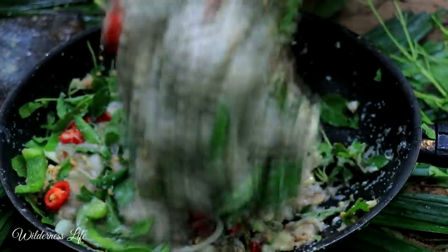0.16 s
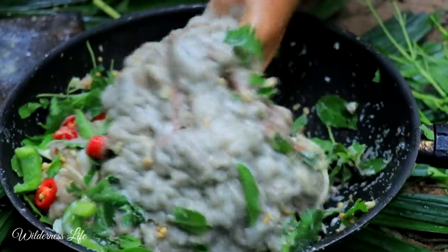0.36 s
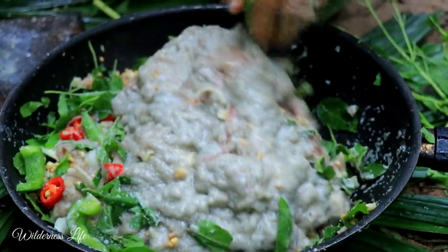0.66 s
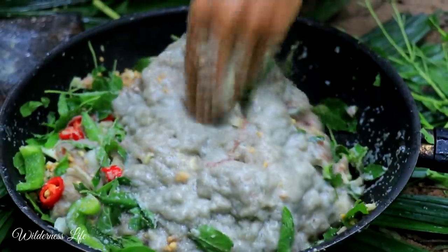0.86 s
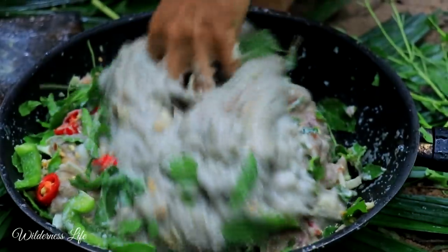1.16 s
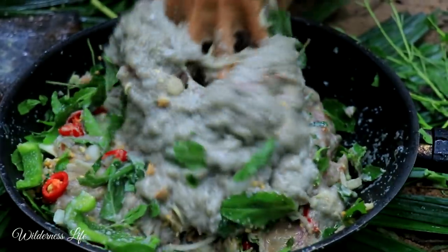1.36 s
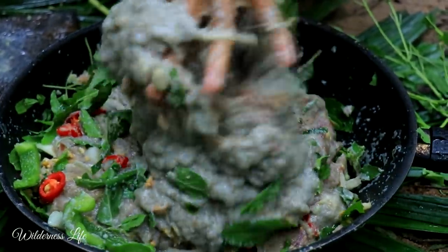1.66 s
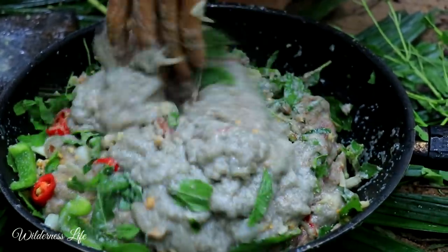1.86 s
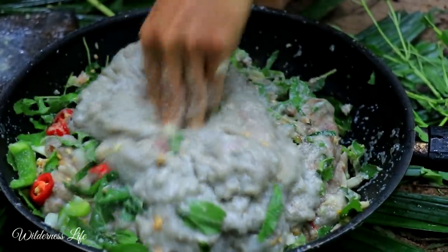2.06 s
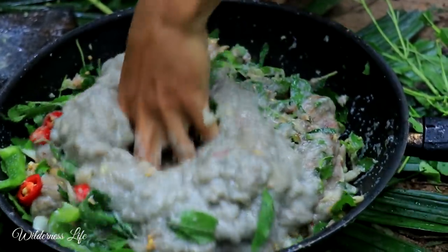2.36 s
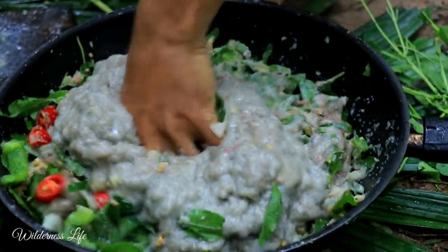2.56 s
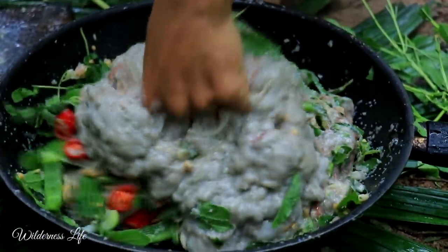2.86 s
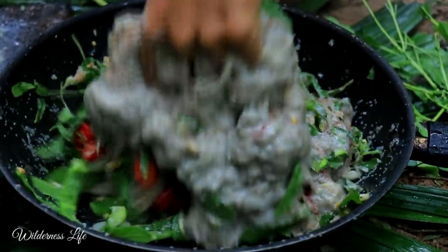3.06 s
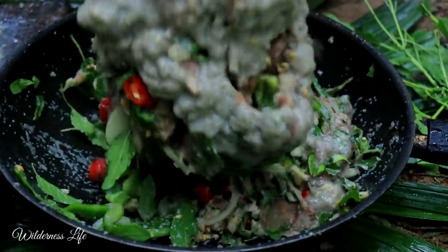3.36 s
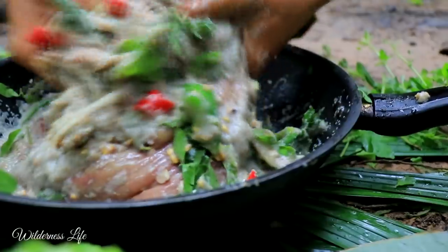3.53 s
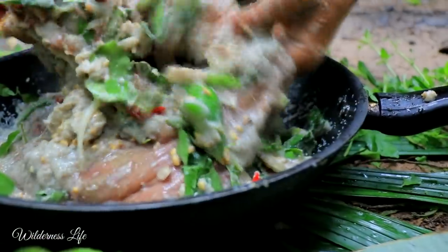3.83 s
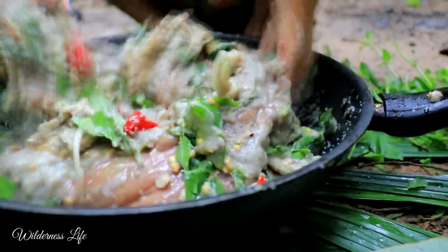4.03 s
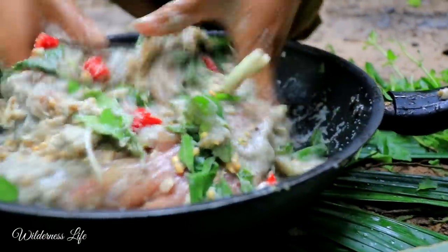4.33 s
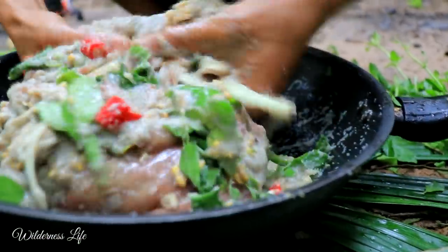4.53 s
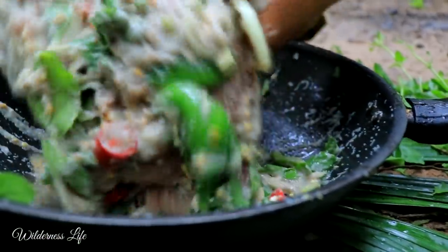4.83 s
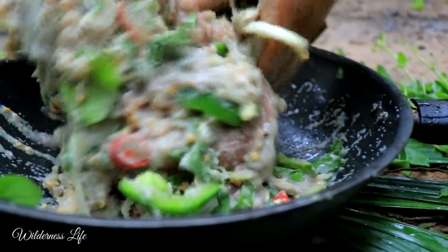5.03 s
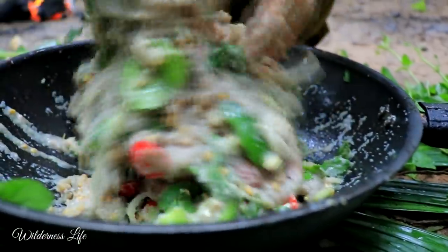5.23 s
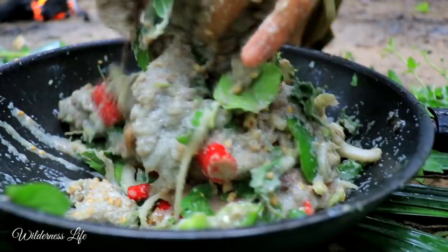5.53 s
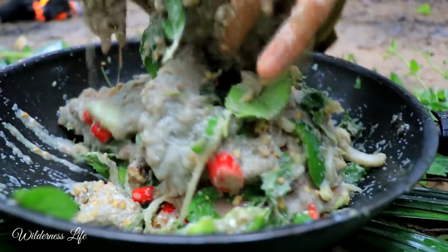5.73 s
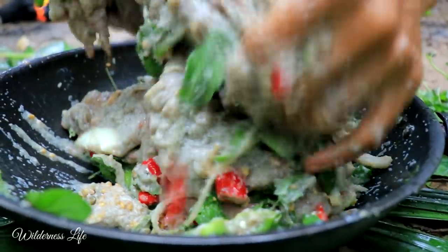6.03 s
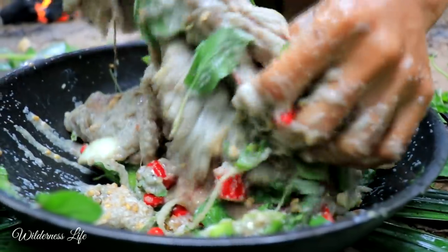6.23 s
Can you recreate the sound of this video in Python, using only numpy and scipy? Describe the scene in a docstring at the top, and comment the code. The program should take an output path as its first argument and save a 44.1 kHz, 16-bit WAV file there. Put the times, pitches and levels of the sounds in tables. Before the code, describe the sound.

Very close stereo microphones catch hands working a sticky, wet mass in a pan outdoors. Small bubbles smack, air pockets pop and slime smears, while a faint rising bird whistle and one dry trill sound early on. A tiny dropout breaks the sound midway, then the squelching returns louder and thicker, with gurgles, before easing off. Low rumble, hiss and insects lie far behind.

```python
"""Hands knead a wet, sticky mass of roe in a pan outdoors, close to a pair of microphones.
Air pockets pop, small bubbles smack and gurgle (damped tones of rising pitch); slime smears as shaped noise.
Far off lie a low rumble, hiss and insects (bands of noise); a rising bird whistle and a faint far call
are gliding tones, one dry trill is a roll of ringing modes. The sound drops out once, briefly."""
import sys
import numpy as np
from scipy import signal
from scipy.fft import rfft, irfft, next_fast_len
from scipy.io import wavfile
from scipy.ndimage import map_coordinates

SR = 44100
rng = np.random.default_rng(int(sys.argv[2]) if len(sys.argv) > 2 else 0)


def unload_audio(sound):
    """Save the sound as a 16-bit wav file, at the path given as the first command line argument."""
    columns = np.transpose(np.atleast_2d(sound))
    # keep every value between -1 and 1, then stretch to whole-number steps
    steps = np.round(np.clip(columns, -1, 1) * 32767)
    wavfile.write(sys.argv[1], SR, steps.astype(np.int16))


N = 281799

# the brief silence: (start [s], end [s])
SILENCE = (3.4455, 3.508)


def amp(db):
    """Gain of a level in dB."""
    return 10 ** (np.asarray(db) / 20)


def unit(x):
    """x at rms 1."""
    return x / np.sqrt(np.mean(x ** 2) + 1e-20)


def along(points, hz):
    """Values at hz, read from (Hz, value) points on a log frequency axis."""
    f, v = np.transpose(points)
    return np.interp(np.log(hz + 1), np.log(f + 1), v, left=v[0], right=v[-1])


def curves(rows):
    """One value per sample for each column after the time."""
    s, *cols = np.transpose(rows)
    return [np.interp(np.arange(N) / SR, s, c) for c in cols]


def wobble(rate):
    """A smooth random curve, rate knots a second."""
    knots = rng.standard_normal(N // 100)
    return map_coordinates(knots, [np.arange(N) * rate / SR])


def filtered(x, response):
    """x with its spectrum multiplied by a response of frequency."""
    m = next_fast_len(N + 8192)
    spectrum = rfft(x, m) * response(np.fft.rfftfreq(m, 1 / SR))
    return irfft(spectrum, m)[..., :N]


def rush(spectrum, alike):
    """Stereo noise of rms 1; the likeness of left and right sets its mix of mid and side at each frequency."""
    def mid_side_gain(hz):
        turn = np.arccos(np.clip(along(alike, hz), -1, 1)) / 2
        return amp(along(spectrum, hz)) * [np.cos(turn), np.sin(turn)]

    mid, side = filtered(rng.standard_normal((2, N)), mid_side_gain)
    return unit(np.array([mid + side, mid - side]))


def bubbles(s, db, hz, cycles, pan_db, lag_s, size, rise=0.01076, start=0.1107):
    """Damped tones whose pitch climbs as the cavity opens; each has its own level and time at either microphone."""
    out, k = np.zeros((2, N)), np.arange(size)
    for ch, side in enumerate((.5, -.5)):
        at = (s + side * lag_s) * SR
        first = np.ceil(at)
        turns = (k + (first - at)[:, None]) * hz[:, None] / SR
        swell = start * np.sqrt(cycles)[:, None]  # a longer-lived cavity starts more softly
        shape = amp(-60 * turns / cycles[:, None]) * (1 - np.exp(-turns / swell))
        shape *= amp(db + side * pan_db)[:, None] / shape.max(axis=1, keepdims=True)
        tone = shape * np.sin(2 * np.pi * turns * (1 + rise * turns))
        index = np.clip(first.astype(int)[:, None] + k, 0, N)
        out[ch] = np.bincount(index.ravel(), tone.ravel(), N + 1)[:N]
    return out


def swarm(count, centre_hz, octaves, cycles, scatter_db, pan_db, lag_s, size):
    """A random crowd of bubbles at rms 1; any scatter in level makes many small and few large."""
    u, g = rng.random((count, 2)), rng.standard_normal((count, 4))
    hz = np.clip(centre_hz * 2 ** (octaves * g[:, 0]), 200, SR / 3)
    db = -scatter_db * np.log(u[:, 1] + 0.0033)
    life = cycles * 1.743 ** g[:, 1]
    return unit(bubbles(u[:, 0] * N / SR, db, hz, life, pan_db * g[:, 2], lag_s * g[:, 3], size))


def glide(rows, waver_hz, flutter_db, rate):
    """A gliding, slightly unsteady tone, silent outside its rows."""
    hz, db = curves(rows)
    t = np.arange(N) / SR
    on = (t >= rows[0][0]) & (t < rows[-1][0])
    level = amp(db + flutter_db * wobble(rate))
    phase = 2 * np.pi * np.cumsum(hz + waver_hz * wobble(rate)) / SR
    return on * level * np.sqrt(2) * np.sin(phase)


def kneading():
    """Levels in dB of big pockets, small bubbles and film: the powers of steady effort and squeezes added."""
    # steady working of the hands: (time [s], effort [relative dB], brightness [dB]: film up, pockets down)
    steady = [(0, -63.5, 5.5), (.5, -55, 0), (.78, -62.5, 1), (1.0, -59.5, -0.5), (1.3, -55, 3),
              (1.55, -62, -0.5), (2.0, -64, 1.5), (2.4, -54, -2), (3.0, -53.5, -6), (3.44, -56.5, -1),
              (3.51, -46, -1.5), (3.75, -51.5, 1.5), (4.17, -50, -6), (4.22, -61, 6), (4.28, -62, 13.5),
              (4.295, -45, -4), (4.9, -47, -1.5), (5.3, -52.5, 0.5), (5.62, -57, 2), (6.15, -63.5, 0),
              (6.39, -55, 6)]
    # single squeezes on top: (time of peak [s], peak [relative dB], length [s], brightness [dB])
    grips = [(.01, -50, 0.031, 9), (0.331, -45.5, 0.122, -2), (1.037, -43.5, 0.0145, -4),
             (1.215, -56, 0.194, -6.5), (1.435, -53.5, 0.055, 1.5), (1.614, -54.5, 0.108, -2),
             (1.897, -45, 0.0525, -2), (2.115, -53.5, 0.096, 6), (2.313, -50, 0.0455, -6),
             (2.704, -48, 0.18, -6), (2.846, -51.5, 0.043, 7), (3.141, -51.5, 0.112, -1),
             (3.269, -43.5, 0.071, -2.5), (3.619, -53.5, 0.07, -10.5), (3.962, -47.5, 0.041, -2),
             (4.079, -53, 0.115, 7.5), (4.397, -38, 0.1093, -3), (4.472, -44.5, 0.213, -7.5),
             (4.597, -44, 0.0345, -5.5), (4.644, -44.5, 0.081, -10), (4.728, -41.5, 0.1845, -0.5),
             (5.029, -47, 0.106, -5), (5.21, -65, .08, 0), (5.745, -49.5, 0.022, -9.5),
             (5.982, -48, 0.263, 3)]
    # gain for each dB of brightness: (pockets [dB], bubbles [dB], film [dB])
    tilt = np.array((-1.027, 0.122, 0.87))[:, None]
    rise_share, edge_db = 0.482, 10.5  # part of a squeeze spent rising; drop from its peak to either end

    t = np.arange(N) / SR
    effort_db, bright_db = curves(steady)
    power = amp(effort_db + tilt * bright_db) ** 2
    for s, db, length, squeeze_bright_db in grips:
        away = np.where(t < s, (s - t) / rise_share, (t - s) / (1 - rise_share)) / length
        power = power + amp(db + tilt * squeeze_bright_db) ** 2 * amp(-edge_db * away) ** 2
    return 10 * np.log10(power)


def clumps(count, fade_s, floor):
    """A random curve of spread 1 that jumps up as slime tears and sinks back more slowly."""
    u, tears = rng.random((count, 2)), np.zeros(N)
    tears[(u[:, 0] * N).astype(int)] = -np.log(u[:, 1] + 1e-6)
    fading = signal.lfilter([1], [1, -np.exp(-1 / (fade_s * SR))], tears)
    curve = np.log(fading + floor)
    return unit(curve - curve.mean())


def squelch():
    """Trapped air of several sizes crackles, mostly in clumps, while slime smears along hand and pan."""
    # colour of the smearing slime: (frequency [Hz], level [relative dB])
    slime_colour = [(200, -13.5), (350, 7.5), (700, -5.5), (1200, 6), (2500, -6), (4000, -4.5), (6000, -17),
                    (10000, -8), (16000, -47)]
    # the mass close to the microphones: (frequency [Hz], left-right likeness [-1 to 1])
    close_likeness = [(60, 0.86), (240, 1), (950, 0.5), (3770, -0.51), (15000, 0.25)]
    mush_db, mush_per_db = -49, 0.13  # above this level the clumps run together, by this share for each dB

    pocket_db, bubble_db, film_db = kneading()
    apart = np.clip(1 - mush_per_db * (bubble_db - mush_db), 0, 1)
    clump = clumps(count=480, fade_s=0.0185, floor=0.24) * apart
    pockets = swarm(count=4000, centre_hz=1084, octaves=0.4625, cycles=7.5, scatter_db=3.0,
                    pan_db=4.0, lag_s=3e-5, size=500)
    smacks = swarm(count=6000, centre_hz=2800, octaves=0.3644, cycles=6.56, scatter_db=3.0,
                   pan_db=4.5, lag_s=8e-5, size=250)
    film = swarm(count=14000, centre_hz=8200, octaves=.55, cycles=13, scatter_db=3.5,
                 pan_db=3, lag_s=9e-5, size=100)
    lesser = swarm(count=260, centre_hz=4340, octaves=1.129, cycles=7.5, scatter_db=0.0,
                   pan_db=1.5, lag_s=0.000139, size=600)
    gulps = swarm(count=900, centre_hz=480, octaves=0.386, cycles=3.67, scatter_db=2,
                  pan_db=6.0, lag_s=1.5e-5, size=1200)
    out = amp(pocket_db - 5.0 + 2.96 * clump) * pockets
    # smacks and film lean to the right
    out += amp(bubble_db - 1.0 + 0.67 * clump) * smacks * amp([[-1.1], [1.1]])
    out += amp(film_db + 0.7252 + 3.22 * clump) * film * amp([[-.8], [.8]])
    out += amp(bubble_db - 8) * lesser
    out += amp(pocket_db - 13.5 + 3.3 * clump) * gulps
    smear_db = pocket_db - 6.0 + 1.3 * clump + 2.3 * wobble(150)
    return out + amp(smear_db) * rush(slime_colour, close_likeness)


def bowl(x, t60, count):
    """The pan walls scatter the sound into very short noise tails, taken in turn as the mass shifts."""
    t = np.arange(SR // 20) / SR
    turn = np.arange(N) * 10 // SR % count  # ten tails a second
    out = np.zeros((2, N))
    for k in range(count):
        tail = rng.standard_normal((2, len(t))) * amp(-60 * t / t60) * (t > .0015)
        out += signal.oaconvolve(x * (turn == k), tail / np.linalg.norm(tail[0]), axes=1)[:, :N]
    mid = out.mean(axis=0)
    # long waves reach both microphones alike
    return mid + filtered(out - mid, lambda hz: hz / (hz + 1500))


def background():
    """Distant rumble, open-air hiss and a fuzzy band of insects, each a noise shaped in frequency."""
    # far sounds: (time [s], rumble level [dB], insect level [dB])
    far_levels = [(0, -39.5, -59.5), (1.2, -37, -59.5), (2.4, -39, -60), (3.47, -38.5, -57),
                  (3.49, -43.5, -63.5), (5, -43.5, -66), (6.39, -42, -59)]
    # rumble up to the end of the silence: (frequency [Hz], level [relative dB])
    rumble_before = [(15, -47), (25, -21), (59, -7), (102, -1.5), (135, 0.5), (224, -6), (397, -21.5),
                     (454, -28), (600, -30.5), (780, -60), (1320, -120)]
    # rumble after the silence: (frequency [Hz], level [relative dB])
    rumble_after = [(15, -30.5), (25, -10.5), (86, -3), (141, 1), (196, -3), (277, -16), (382, -11.5),
                    (466, -19), (600, -21), (780, -46), (1320, -120)]
    # open-air hiss: (frequency [Hz], level [relative dB])
    air_colour = [(300, 8.5), (500, -0.5), (1000, 0), (2000, -0.5), (3700, -9), (5600, -11.5), (9300, -7),
                  (13000, -12.5), (15300, -18), (16200, -46)]
    # far sounds at the two microphones: (frequency [Hz], left-right likeness [-1 to 1])
    far_likeness = [(60, 0.973), (240, 0.978), (950, 0.052), (3770, 0.05), (15000, 0.059)]

    rumble_db, insect_db = curves(far_levels)
    insect_band = [(3800, -58), (4200, -5.5), (4600, -2.0), (5000, -10), (5500, -57.5)]  # (Hz, relative dB)
    insects = rush(insect_band, far_likeness)
    early = np.arange(N) < SILENCE[1] * SR
    rumble = np.where(early, rush(rumble_before, far_likeness), rush(rumble_after, far_likeness))
    hiss = amp(-51.0 + 1.15 * wobble(25)) * rush(air_colour, far_likeness)
    return amp(rumble_db) * rumble + hiss + amp(insect_db + 1.2 * wobble(8.9)) * insects


def woods(x, t60):
    """A smeared tail from the trees around: the sound convolved with fading noise."""
    tail = rng.standard_normal(SR // 3) * amp(-60 * np.arange(SR // 3) / SR / t60)
    return signal.oaconvolve(x, tail / np.linalg.norm(tail))[:N]


def bird_whistle():
    """Two rising whistles as wavering tones, with echoes off nearby trunks and a tail from the woods."""
    # one list for each whistle: (time [s], pitch [Hz], direct level [dB])
    phrases = [
        [(0, 2042, -57.5), (.02, 2041, -56), (.028, 2045, -70.5), (.04, 2075, -60.5), (.062, 2090, -55.5),
         (.074, 2197, -72), (.084, 2298, -50.5), (.098, 2345, -53), (.11, 2486, -57.5), (.13, 2535, -48),
         (.157, 2602, -44), (.166, 2776, -53), (.18, 2915, -47), (.195, 2960, -53), (.205, 2980, -67.5)],
        [(.31, 3000, -66), (.322, 3032, -51), (.34, 3050, -56.5), (.358, 3060, -47.5), (.372, 3250, -56.5),
         (.386, 3600, -52), (.402, 3780, -51.5), (.417, 3954, -52), (.425, 3960, -70)],
    ]
    # echoes off nearby trunks: (delay [s], level [dB] relative to the direct whistle)
    trunk_echoes = [(.013, -12), (.027, -17)]

    direct = sum(glide(rows, waver_hz=60, flutter_db=3, rate=300) for rows in phrases)
    echoes = sum(amp(db) * np.roll(direct, round(s * SR)) for s, db in trunk_echoes)
    return direct + echoes + amp(-15) * woods(direct, t60=.3)


def pops():
    """Single bursts: a tone, a dry snap of the skin and a broad tick, louder and earlier on the nearer side."""
    # single pops, loud and faint, in no strict order of time:
    # (time [s], tone peak [dB], pitch [Hz], life [cycles to -60 dB], left over right [dB])
    bursts = [(0.023, -33.5, 2230, 8, -3.5), (0.111, -39.5, 1100, 14, 2), (0.13, -25.5, 2800, 5, -4),
              (0.314, -32, 1660, 9, 1.5), (0.334, -32, 2290, 14, -4), (0.39, -37, 800, 7, -5),
              (0.492, -39, 5030, 5.5, 0.5), (1.18, -31, 9200, 13, 20.5), (1.292, -35.5, 3585, 14, -2),
              (1.401, -36.5, 950, 12, 1), (1.565, -28, 7900, 9.5, -1.5), (1.813, -34.5, 1600, 7.5, -7),
              (1.903, -38.5, 2600, 10.5, -4.5), (2.0525, -36.5, 2190, 8.5, -1),
              (2.089, -30.5, 4000, 2.5, 0), (2.3533, -31, 9500, 6, -0.5), (2.604, -30, 2290, 11, -3.5),
              (2.654, -30, 6050, 11, 1.5), (2.692, -30.5, 1800, 11, -7.5), (2.756, -30.5, 1520, 18.5, -1.5),
              (2.786, -32.5, 2635, 18.5, 0), (2.8513, -30.5, 2660, 9, 1), (2.8876, -25, 7820, 8, 0.5),
              (2.9537, -31, 3564, 13, -2.5), (2.982, -32.5, 2550, 8.5, -1.5), (3.1883, -28.5, 925, 5, 2),
              (3.292, -29.5, 700, 6, -0.5), (3.313, -31, 2480, 10.5, -3), (3.5577, -26, 2850, 6, -2),
              (3.572, -31.5, 2920, 11.5, 4.5), (3.598, -32, 1010, 15.5, 2), (3.6682, -29.5, 2250, 11, 1),
              (3.8411, -28, 7070, 11.5, -10), (3.155, -33, 2700, 9.5, -0.5), (3.217, -31, 2000, 2.5, 0),
              (3.236, -30, 1450, 7.5, 0.5), (3.267, -32, 950, 4, 0.5), (4.017, -30.5, 2460, 12, 1),
              (4.6586, -29.5, 680, 13, 1), (4.675, -29.5, 620, 9, -0.5), (5.024, -31, 950, 16, -1.5),
              (5.275, -27.5, 5700, 3, 11.5), (5.549, -34.5, 1730, 14.5, -0.5),
              (5.878, -29.5, 2510, 10, -3.5), (6.0453, -26.5, 10500, 15, -4.5), (0.283, -29, 3406, 8, -1),
              (0.354, -16, 8000, 3.5, -3.5), (0.415, -27.5, 6130, 10, 4), (0.485, -32, 3340, 18.5, 1),
              (0.5564, -20.5, 10300, 7, -1.5), (0.569, -23.5, 2160, 3.5, 1.5),
              (0.672, -21, 8500, 2.5, -5.5), (0.7207, -29, 1540, 2.5, 2), (0.973, -31.5, 7430, 8.5, -2),
              (1.035, -31, 800, 8.5, 1.5), (1.0706, -25, 3770, 5, 0.5), (1.1849, -30.5, 859, 7.5, -1),
              (1.198, -35, 900, 3.5, -0.5), (1.166, -37, 1602, 6, 0), (1.186, -37, 2150, 9.5, 0),
              (0.8084, -40, 3400, 4, 0), (0.897, -41, 2500, 5, -3.5), (0.96, -41.5, 1280, 7.5, -0.5),
              (0.984, -39, 1200, 4.5, -0.5), (1.2124, -20, 3150, 6, -5), (1.224, -29, 1271, 0.5, -6.5),
              (1.327, -29, 7950, 20.5, -5.5), (1.4423, -30, 2304, 13, 4), (1.529, -23.5, 10840, 5, -4),
              (1.894, -32.5, 2493, 22, 15), (2.113, -31.5, 1820, 6, 1), (2.145, -25, 1690, 6, -0.5),
              (1.26, -37.5, 790, 13.5, 0), (2.2607, -34.5, 1193, 17, -1), (2.326, -37.5, 1230, 13.5, 4.5),
              (3.3975, -34, 1500, 7, -4), (5.0766, -32.5, 810, 5.5, -1), (5.5043, -38, 1160, 9, 6),
              (5.824, -35, 1214, 13.5, 1.5), (4.8895, -26, 1686, 10.5, -1.5),
              (2.196, -27.5, 10560, 10, -3.5), (2.2604, -26.5, 3270, 7, -1.5), (2.4523, -20, 2220, 2, -1),
              (2.468, -28, 3120, 6, -11), (2.569, -30, 1200, 5.5, 0.5), (2.5893, -27, 2281, 6, -3),
              (2.67, -18.5, 3590, 4, -1.5), (2.667, -31, 1000, 4.5, -1.5), (2.945, -31.5, 2200, 5.5, -0.5),
              (2.971, -30.5, 2597, 6.5, -1), (2.921, -39.5, 1055, 8.5, -0.5), (3.004, -37, 3810, 7, -1),
              (2.681, -29.5, 850, 10.5, 2.5), (2.84, -28, 834, 11.5, -1.5), (2.8405, -29, 2370, 10.5, -4.5),
              (2.8664, -30.5, 2065, 28, -4), (2.6314, -32.5, 2690, 10, -1.5), (3.952, -32, 650, 15.5, 1),
              (5.1699, -23, 2800, 6, 3), (0.13, -31.5, 5450, 31.5, -1.5), (0.0486, -36, 1290, 6.5, 2.5),
              (2.877, -20, 4400, 2, -2.5), (2.895, -24, 11270, 10.5, -7.5), (2.9117, -23, 1230, 4.5, -0.5),
              (3.0097, -12, 980, 8.5, -1.5), (3.108, -34.5, 798, 4.5, -1), (3.0105, -25, 1800, 4, -1),
              (5.093, -32.5, 2100, 6.5, -0.5), (5.175, -30, 3700, 12.5, 0), (5.174, -28.5, 2000, 8.5, 3),
              (5.215, -30.5, 3300, 6.5, -1), (5.225, -33.5, 1600, 9, -1), (5.3632, -28, 2590, 5.5, 2),
              (5.385, -36.5, 1050, 8.5, 0.5), (5.403, -35.5, 2500, 5, -1), (5.575, -34, 3700, 10.5, 2.5),
              (5.581, -40.5, 750, 8, 0.5), (5.599, -38, 6200, 8.5, 0.5), (5.853, -29, 5980, 10, 1.5),
              (5.9, -32, 2400, 9.5, -0.5), (5.92, -34, 6810, 7.5, 0.5), (5.988, -33.5, 3500, 4, -1.5),
              (6.046, -28, 6200, 7.5, 0), (6.066, -34.5, 3000, 7.5, 0), (6.082, -42.5, 2000, 6.5, -1),
              (6.154, -34, 4500, 6.5, 0), (6.24, -39, 2500, 4, 0.5), (4.33, -29, 903.8, 4, 2.5),
              (4.77, -28.5, 1347, 13.5, -1.5), (3.118, -35, 2900, 8, -0.5), (3.091, -32, 2315, 2.5, -1),
              (3.26, -30.5, 3600, 11, 0), (3.218, -33.5, 3300, 4, -0.5), (3.352, -29, 2600, 5, 2),
              (3.705, -34.5, 4650, 13, 1.5), (3.717, -23.5, 6800, 6, 0.5), (3.816, -29, 3710, 10, 2.5),
              (3.859, -33.5, 6200, 10, -0.5), (4.11, -38, 2300, 9.5, 1.5), (1.232, -38.5, 1300, 5.5, 1),
              (1.232, -34, 3200, 9.5, 1), (1.243, -40, 1250, 7.5, 2), (1.279, -39.5, 950, 7, 0),
              (1.134, -41, 900, 5.5, 1), (3.0236, -24, 1250, 13, 2), (3.0328, -25, 6984, 15.5, -4.5),
              (3.041, -20.5, 5780, 12.5, -2.5), (3.147, -25.5, 1710, 2, 0), (3.1832, -21.5, 2780, 9, -2),
              (3.1935, -28.5, 7300, 11, -5.5), (3.2238, -26.5, 615, 6.5, -1),
              (3.2244, -15.5, 2180, 6, -1.5), (3.2354, -23.5, 2890, 5, 1), (3.251, -26.5, 7800, 11, 0.5),
              (3.2652, -27, 2300, 7.5, -3.5), (3.336, -27, 3310, 16, -1.5), (3.3713, -22.5, 2436, 8.5, 1),
              (3.4387, -25.5, 2877, 10, -2), (3.5244, -24.5, 6700, 8.5, -7.5),
              (3.623, -30.5, 1172, 12.5, 3.5), (3.632, -23.5, 3030, 10.5, 2), (3.731, -32, 1127, 26, -4.5),
              (3.8052, -17.5, 9180, 10.5, -1), (3.908, -26, 6300, 8.5, -4.5), (3.953, -29, 1441, 22, 3),
              (3.963, -27.5, 2460, 12.5, 0), (4, -20, 11390, 4.5, 5), (4.0837, -28, 3750, 27.5, 2),
              (4.1683, -15, 10200, 5, 4), (4.2927, -27.5, 3000, 5.5, 5), (4.3461, -19.5, 666.9, 3, -1.5),
              (4.358, -22.5, 6080, 14, 4), (4.392, -23.5, 639, 4, 0.5), (4.405, -23.5, 1065, 12, -1.5),
              (4.417, -18, 3734, 8.5, -3.5), (4.443, -27.5, 1070, 5, 0.5), (4.461, -28.5, 1960, 9.5, -5),
              (4.47, -29, 1000, 15, 4), (4.5, -19.5, 980, 19, 0.5), (4.515, -26.5, 6700, 13.5, -10),
              (4.529, -25.5, 1160, 2.5, -2.5), (4.5865, -22.5, 1500, 7, 4), (4.5866, -27, 2500, 6.5, 1),
              (4.597, -29.5, 746, 22, 4.5), (4.617, -22, 6140, 11.5, -2.5), (4.638, -25.5, 1420, 21, 1.5),
              (4.6733, -25, 2100, 14.5, -6), (4.698, -25, 3878, 15, 9.5), (4.7189, -26.5, 2548, 4.5, -2),
              (4.7346, -22, 8280, 13.5, -1.5), (4.743, -20.5, 2700, 5, 0.5), (4.8042, -19, 3610, 20, 0),
              (4.845, -17.5, 2980, 3, 2.5), (4.8976, -14.5, 1650, 6.5, 2.5), (4.9208, -15.5, 1580, 7, 0),
              (4.9627, -27.5, 2500, 6, 0.5), (4.864, -30, 3500, 13.5, 0), (4.88, -33, 4200, 9.5, 0.5),
              (4.9208, -20.5, 4900, 11.5, 1.5), (4.953, -23.5, 970, 5, 1.5), (5.009, -29, 3480, 18.5, -1),
              (5.1055, -21.5, 2533, 11, 0.5), (5.127, -19, 2702, 31.5, -1.5),
              (5.1695, -21.5, 6250, 25, -2.5), (5.1951, -19.5, 2665, 9.5, -1.5),
              (5.2096, -30, 8450, 16, -5), (5.363, -22, 6270, 8, 0.5), (5.4008, -31, 736, 8.5, 4),
              (5.4229, -30, 1070, 6, -2), (5.4453, -23.5, 2144, 10.5, 0.5), (5.467, -25, 12400, 15.5, 0),
              (5.4916, -19.5, 6070, 22.5, -5.5), (5.531, -22, 6850, 5.5, -5),
              (5.573, -32.5, 2306, 15, -4.5), (5.74, -34, 688, 11, 0), (5.762, -21, 10930, 6, 11),
              (5.8024, -25.5, 2270, 7.5, -4.5), (5.824, -24, 2880, 8, -2), (5.9, -27.5, 1334, 4.5, 4.5),
              (5.9598, -27.5, 3530, 17.5, 0), (5.997, -22, 8550, 6.5, -5.5),
              (6.0169, -20.5, 5200, 6.5, 10.5), (6.239, -26, 12300, 5.5, 14.5), (6.332, -25, 10800, 7.5, 9),
              (1.045, -35.5, 1450, 8, 0), (1.066, -39, 1350, 11.5, 1.5), (0.505, -39, 1400, 8, -1),
              (0.556, -36, 1400, 4, 1.5), (0.286, -37.5, 4300, 12.5, -0.5), (0.312, -38, 800, 10, -3),
              (1.775, -42.5, 1000, 5, 0), (1.922, -37.5, 2000, 6.5, -4), (1.978, -32.5, 10980, 8, -3),
              (3.025, -27.5, 10900, 17.5, 7), (3.05, -33, 1242, 6, -0.5), (3.06, -32, 12000, 11.5, 0.5),
              (3.1024, -29.5, 10500, 19.5, -8.5), (3.13, -32, 800, 2, -3), (3.16, -30, 2500, 4, -2.5),
              (3.5832, -26.5, 12500, 12, -5), (3.6624, -24, 12000, 10, -1),
              (3.8864, -24.5, 12500, 9.5, -0.5), (3.955, -37.5, 1100, 10.5, -1),
              (4.073, -34.5, 700, 5.5, 3.5), (4.453, -26.5, 480, 2, 0.5), (4.6994, -26.5, 1900, 9, -0.5),
              (4.684, -28.5, 3198, 5.5, -0.5), (4.632, -27.5, 2399, 4.5, -0.5), (4.8975, -25, 11500, 9, 0),
              (5.15, -29, 9500, 13.5, -1), (5.178, -32, 12000, 9.5, -0.5)]

    s, db, hz, cycles, pan_db = np.transpose(bursts)
    same = np.ones_like(s)
    lag_s = -2.5e-5 * pan_db
    tone = bubbles(s, db, hz, cycles, pan_db, lag_s, size=900)
    snap = bubbles(s, db - 18.5, np.minimum(2.13 * hz, 13000), 4.5 * same, pan_db, lag_s, size=100)
    tick = bubbles(s, db - 24.5, 5200 * same, 2.9 * same, pan_db, lag_s, size=40)
    return tone + snap + tick


def trill():
    """Each beat is a quick, uneven roll of three knocks ringing the same short modes, retuned a little each time."""
    # ringing modes of a knock: (frequency [Hz], level [relative dB], fall by 60 dB [s])
    modes = [(950, -11, 0.016), (1280, -6.5, 0.0227), (1800, 4, 0.0172), (2450, -11, 0.0122),
             (3000, -5, 0.0135)]
    start_s, beat_s, beats = 1.1987, .0332, 16
    level_db, scatter_db = -43, 1.5  # gain of a beat's first knock; its spread from beat to beat

    out, t = np.zeros(N), np.arange(SR // 30) / SR
    for k in range(beats):
        db = level_db + scatter_db * rng.standard_normal()
        delays = np.cumsum(rng.uniform(0.0018, 0.0042, 3)) - .003
        for delay, less_db in zip(delays, (0, -1.5, -3)):
            ring = 0
            for hz, mode_db, t60 in modes:
                fade = amp(mode_db + rng.normal(0, 2.3) - 60 * t / t60)
                ring = ring + fade * np.sin(2 * np.pi * hz * rng.normal(1, 0.0204) * t)
            out[round((start_s + k * beat_s + delay) * SR):][:len(t)] += amp(db + less_db) * ring
    return out


def far_call():
    """A faint far call: one wavering tone that stays close to a single note."""
    # the call: (time [s], pitch [Hz], level [dB])
    note = [(1.79, 1600, -72), (1.81, 1609, -61), (1.83, 1606, -70), (1.85, 1606, -56), (1.88, 1605, -64),
            (1.94, 1605, -58.5), (1.99, 1607, -61.5), (2.01, 1600, -78)]
    return glide(note, waver_hz=40, flutter_db=2.5, rate=90)


def gurgles():
    """Air forced through channels in the slime: each lets out a quick string of bubbles on its own drifting pitch."""
    # channels: (start [s], length [s], first pitch [Hz], last pitch [Hz], typical bubble peak [dB])
    channels = [(1.885, 0.0293, 2620, 2650, -39.5), (1.892, 0.0213, 1390, 1240, -44),
                (2.594, 0.0177, 1495, 3000, -38.5), (2.626, 0.0756, 850, 880, -44.5),
                (2.68, .03, 1900, 1950, -43.5), (2.779, .022, 1000, 1100, -43),
                (3.009, 0.0094, 990, 1038, -36), (3.56, 0.0207, 1200, 1300, -41),
                (3.797, .02, 1146, 1200, -45), (3.988, 0.0238, 1590, 1490, -38),
                (4.288, 0.051, 2400, 2800, -50.5), (4.362, 0.0362, 1500, 1800, -43),
                (4.39, 0.0187, 496, 604, -32.5), (4.4, 0.0972, 1110, 1050, -36),
                (4.407, 0.0547, 3399, 3493, -35.5), (4.42, 0.0795, 2199, 2300, -40.5),
                (4.501, 0.057, 1600, 1552, -39.5), (4.505, 0.036, 1000, 1054, -36),
                (4.509, 0.038, 2597, 2700, -41.5), (4.59, 0.028, 760.6, 778, -35),
                (4.59, 0.0314, 2247, 2250, -34.5), (4.659, 0.0403, 1900, 2200, -37),
                (3.028, .015, 1150, 1050, -42.5), (1.222, .03, 1299, 1200, -43.5),
                (4.731, 0.0208, 2800, 3200, -36), (5.929, 0.031, 3600, 3700, -43)]
    rate = 400  # bubbles a second, beside two more for each channel
    life_cycles, pitch_octaves, scatter_db = 9.16, 0.078, 3.5  # life, pitch spread and level spread of a bubble

    counts = [int(row[1] * rate) + 2 for row in channels]
    s, length, first_hz, last_hz, db = np.repeat(channels, counts, axis=0).T
    u, g = rng.random(len(s)), rng.standard_normal((len(s), 3))
    hz = (first_hz + u * (last_hz - first_hz)) * 2 ** (pitch_octaves * g[:, 0])
    return bubbles(s + u * length, db + scatter_db * g[:, 1], hz, np.full_like(s, life_cycles),
                   1.9 * g[:, 2], 0 * s, size=800, start=0.156)


def suck():
    """The mass sucks free of the pan: two gaps draw air, each a wavering tone on the same rising pitch."""
    # the pull: (time [s], pitch [Hz], level [relative dB])
    pull = [(3.99, 161.4, -48), (4.005, 182.3, -34), (4.03, 217.5, -37), (4.05, 223.2, -36),
            (4.068, 267, -35), (4.085, 283, -41), (4.1, 300, -62)]
    return sum(amp(-3) * glide(pull, waver_hz=30, flutter_db=3, rate=110) for gap in range(2))


def scene():
    """Kneading close to the microphones, animals and rumble far off."""
    near = squelch() + pops() + gurgles()
    out = near + amp(-5) * bowl(near, t60=0.0155, count=8) + background()
    # left and right gains in dB
    out += (bird_whistle() + far_call()) * amp([[-1.5], [1.5]])
    out += trill() * amp([[.4], [-.4]])
    return out + suck() * amp([[.3], [-.3]])


def record(dry):
    """The sound drops out for a moment, with half-millisecond edges; the top treble rolls off to a band limit."""
    top_hz = 16700
    rolloff = [(14500, 0.0), (15600, -5.0), (16000, -24)]  # (Hz, dB)
    t = np.arange(N) / SR
    on = np.clip(np.maximum(SILENCE[0] - t, t - SILENCE[1]) * 2000, 0, 1)
    return filtered(dry * on, lambda hz: amp(along(rolloff, hz)) * (hz < top_hz))


dry = scene()
out = record(dry)
unload_audio(out)
```